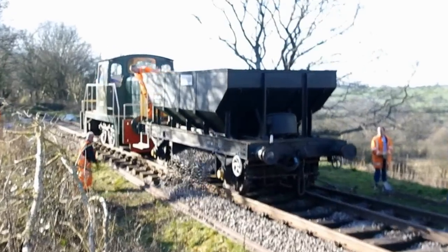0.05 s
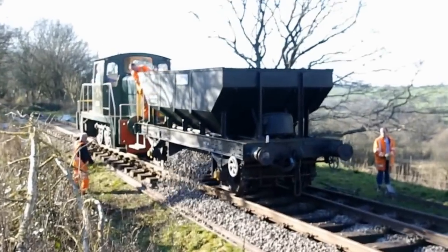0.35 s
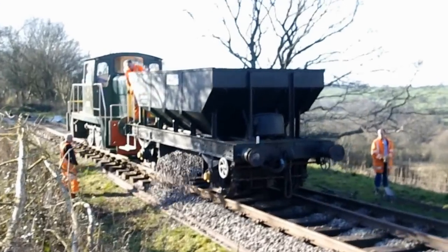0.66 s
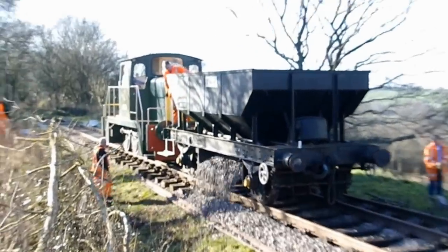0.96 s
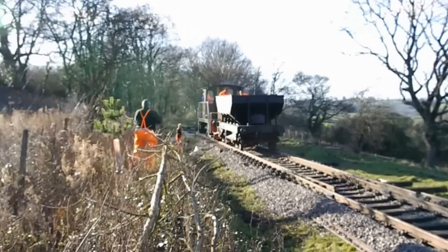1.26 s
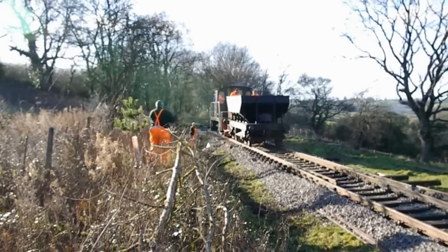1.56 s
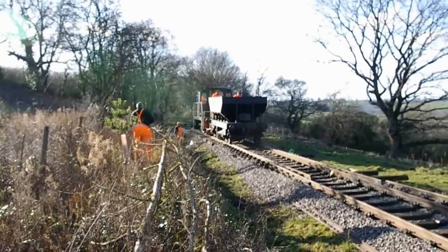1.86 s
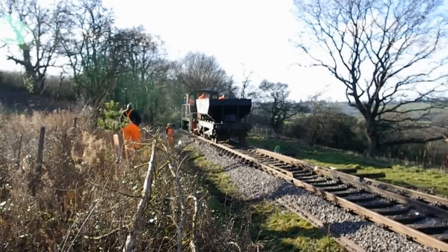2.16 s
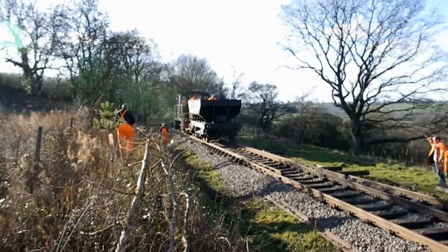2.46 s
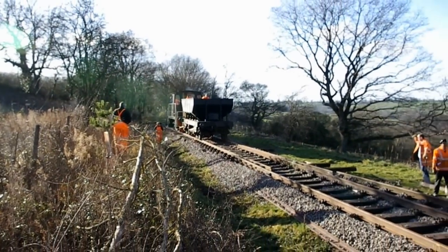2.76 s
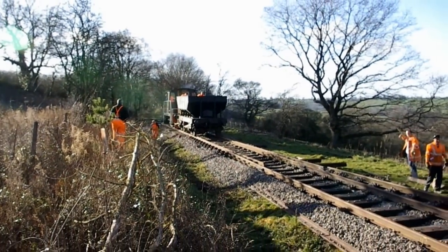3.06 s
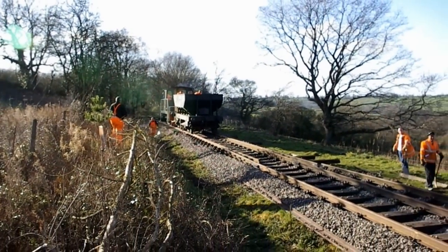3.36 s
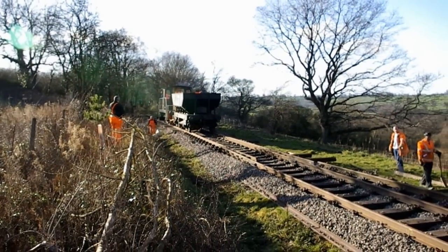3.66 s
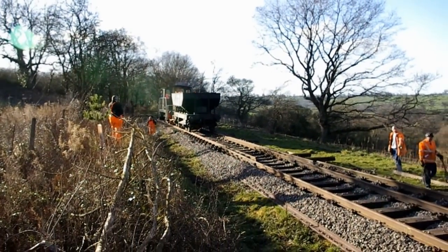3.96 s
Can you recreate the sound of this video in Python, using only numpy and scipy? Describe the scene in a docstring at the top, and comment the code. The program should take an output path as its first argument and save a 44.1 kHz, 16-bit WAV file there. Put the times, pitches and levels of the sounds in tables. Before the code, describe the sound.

Gravel slides and clatters out of a steel rail wagon as wind buffets the microphone.

```python
"""Trackside, one microphone in the wind, close to a steel hopper wagon pouring ballast on the track.
First the stones slide steadily from the chute, a locomotive faint behind, and it all fades to silence.
At 1.18 s a second view cuts in: stones grind and crack, the wagon drums and rings, the engine is louder.
A stone pings on steel, a dull knock follows, and the engine drops back. Just after 3 s the strongest
gusts buffet the microphone, and the recorder's limiter ducks the stones under them."""
import sys
import numpy as np
from scipy import signal
from scipy.fft import rfft, irfft
from scipy.io import wavfile
from scipy.ndimage import uniform_filter1d

SR = 44100
rng = np.random.default_rng(int(sys.argv[2]) if len(sys.argv) > 2 else 0)


def dump_mix(stems):
    """Bounce the given channels to the path in sys.argv[1] as a 16-bit WAV at rate SR."""
    frames = np.atleast_2d(stems).T  # one column per channel
    limited = np.clip(frames, -1, 1)  # hard clip at full scale
    pcm = np.round(limited * 32767).astype(np.int16)
    wavfile.write(sys.argv[1], SR, pcm)


N = 176400
T = np.arange(N) / SR


def amp(db):
    """Decibels to gain."""
    return 10 ** (np.asarray(db) / 20)


def unit(x):
    """Scales to rms 1."""
    return x / np.sqrt(np.mean(x ** 2) + 1e-20)


def level(points):
    """Gain over time from rows of seconds and dB."""
    return amp(np.interp(T, *np.transpose(points)))


def add(mix, start_s, sound):
    """Mixes a sound in at its start time."""
    part = mix[round(start_s * SR):][:len(sound)]
    part += sound[:len(part)]


def colour(x, spectrum):
    """Causal filter with the given spectrum; the result has rms 1."""
    hz, db = np.transpose(spectrum)
    bin_hz = abs(np.fft.fftfreq(4096, 1 / SR)) + 1
    log_gain = np.log(amp(np.interp(np.log(bin_hz), np.log(hz), db)))
    taps = np.fft.ifft(np.exp(np.conj(signal.hilbert(log_gain)))).real
    return unit(signal.oaconvolve(x, taps[:len(taps) // 2])[:N])


def wander(top_hz):
    """Random drift that rolls off above top_hz."""
    hz = np.fft.rfftfreq(N, 1 / SR)
    band = (hz > top_hz / 10) / (1 + (hz / top_hz) ** 2) ** 2
    return unit(irfft(rfft(rng.standard_normal(N)) * band, N))


def impacts(per_s, spread_db):
    """Random blows, many small and a few large."""
    size = amp(spread_db * np.minimum(rng.exponential(1, N), 5))
    return size * rng.choice([-1, 1], N) * (rng.random(N) < per_s / SR)


def scatter(x, wet_db, t60):
    """Adds a short diffuse echo off the wagon, track bed and trees."""
    t = np.arange(SR // 2) / SR
    tail = rng.standard_normal(len(t)) * 10 ** (-3 * t / t60) * (t > .002)
    return x + amp(wet_db) * signal.oaconvolve(x, tail / np.linalg.norm(tail))[:N]


# The engine's rumble. Each row: frequency in Hz, relative level in dB.
ENGINE_SPECTRUM = [(25, -24), (50, -13), (85, -4.5), (125, 3.5), (170, 5.5), (240, 1), (330, 0.5), (600, 5),
                   (2000, -61.5)]
# Its rise and fall behind the wagon. Each row: time in seconds, level in dB.
ENGINE_LEVELS = [(0, -61), (1.14, -49), (1.18, -44.5), (2.3, -43), (2.65, -44.5), (2.9, -53), (4.0, -49)]
def locomotive(firing_hz=33, depth=0.76):
    """In the background, exhaust puffs at the firing rate."""
    puffs = (1 + depth * np.cos(2 * np.pi * firing_hz * T)) * rng.standard_normal(N)
    return level(ENGINE_LEVELS) * colour(puffs, ENGINE_SPECTRUM)


# Gusts on the microphone. Each row: middle in seconds, length in seconds, level in dB.
MIC_GUSTS = [(0.048, 0.075, -38), (.13, 0.0082, -30), (.19, 0.021, -41), (0.247, 0.023, -33.5),
             (0.343, 0.11, -46), (0.818, 0.19, -35), (1.1, .07, -31), (1.408, 0.079, -41),
             (1.526, 0.015, -33), (1.563, 0.011, -31), (1.721, .016, -23), (1.76, 0.042, -39),
             (1.836, 0.043, -35.5), (1.885, .02, -26.5), (1.924, .015, -35), (2.054, 0.057, -18.5),
             (2.116, 0.038, -31.5), (2.243, 0.044, -41), (3.123, 0.047, -22), (3.182, 0.011, -14),
             (3.253, 0.022, -12), (3.277, 0.0094, -15), (3.278, 0.18, -20), (3.314, 0.0089, -18.5),
             (3.366, .012, -11), (3.42, 0.047, -29.5), (3.478, 0.12, -35), (3.513, 0.0074, -34),
             (3.683, 0.013, -34)]
# Their low buffeting. Each row: frequency in Hz, relative level in dB.
WIND_SPECTRUM = [(25, -32), (40, -37), (60, -24.5), (90, -9.5), (160, -4), (240, 3), (330, -3.5), (440, -6),
                 (600, -15), (900, -23.5), (2000, -56), (6000, -86)]
def wind(breeze_db=-64, lump_db=4, steepness=4.4):
    """Lumpy turbulence right at the microphone, swelling with each gust."""
    gusts = sum(amp(db) / (1 + abs(1.86 * (T - middle) / length) ** steepness)
                for middle, length, db in MIC_GUSTS)
    eddies = colour(rng.standard_normal(N), WIND_SPECTRUM) * amp(lump_db * wander(top_hz=70))
    running_rms = np.sqrt(uniform_filter1d(eddies ** 2, size=1500) + 1e-9)
    return (amp(breeze_db) + gusts) * eddies / running_rms


# A knock amid the stones. One row: start in seconds, peak in dB, decay in seconds.
DULL_KNOCK = (2.819, -16.5, 0.0053)
# Its body. Each row: frequency in Hz, relative level in dB.
KNOCK_SPECTRUM = [(80, -29), (250, -1), (500, -11), (850, -2), (1400, -13), (4000, -47)]
def knock():
    """One dull blow that dies away at once."""
    start, db, decay = DULL_KNOCK
    burst = rng.standard_normal(N) * (T >= start) * np.exp(-abs(T - start) / decay)
    blow = colour(burst, KNOCK_SPECTRUM)
    return amp(db) * blow / abs(blow).max()


# Stones drumming on wagon and sleepers. Each row: frequency in Hz, relative level in dB.
DRUM_SPECTRUM = [(150, -18), (500, -14), (750, -5), (920, -1), (1080, -1), (1400, 3), (1750, -0.5),
                 (2300, -4.5), (3200, -10.5), (6000, -49)]
# The drumming from the trackside. Each row: time in seconds, level in dB.
DRUM_LEVELS = [(1.18, -31.5), (1.27, -31.5), (1.6, -29), (1.8, -29), (1.94, -27), (2.15, -29.5), (2.5, -28),
               (2.8, -29.5), (3.1, -31), (3.55, -32), (3.9, -35), (4.0, -35.5)]
# The steel plates. Each row: frequency in Hz, relative level in dB, seconds to fall 60 dB.
PLATE_MODES = [(475, -6, 0.23), (524.4, -5.5, 0.22), (917.5, -4, 0.33), (1326, -9, 0.16),
               (1447, -10.5, .15), (1525, -7, 0.1), (1572, -14, .2), (1697, -4.5, 0.18), (1774, -3.5, 0.16),
               (2010, -17.5, 0.6), (3335, -8, 0.29)]
# The hollow hopper. Each row: frequency in Hz, relative level in dB.
BOOM_SPECTRUM = [(150, -26), (330, -16.5), (430, 0.5), (550, 2.5), (700, -5), (900, -11), (1500, -23),
                 (4000, -58)]
def wagon(blows_per_s=2500, spread_db=3.5, plates_db=-10):
    """Stones drum on the wagon: the plates ring, and the hopper booms less as it empties."""
    thuds = colour(scatter(impacts(blows_per_s, spread_db), wet_db=-2, t60=0.17), DRUM_SPECTRUM)
    ring, t = np.zeros(N), np.arange(SR // 2) / SR
    for hz, db, t60 in PLATE_MODES:
        mode = np.sin(2 * np.pi * hz * t) * 10 ** (-3 * t / t60)
        hits = impacts(per_s=130, spread_db=spread_db)
        ring += amp(db) * unit(signal.oaconvolve(hits, mode)[:N])
    boom_db = -36 - 3 * np.maximum(T - 3.3, 0)  # falls 3 dB a second after 3.3 s
    boom = amp(boom_db) * colour(impacts(blows_per_s, spread_db), BOOM_SPECTRUM)
    return level(DRUM_LEVELS) * (thuds + amp(plates_db) * ring) + boom


# Stone on steel. One row: start in seconds, pitch in Hz, level in dB, rise and decay in seconds.
STEEL_PING = (2.349, 9645, -17, .008, .014)
def ping():
    """One stone strikes steel, which rings with a brief high tone."""
    out, t = np.zeros(N), np.arange(SR // 10) / SR
    start, hz, db, rise, decay = STEEL_PING
    envelope = np.minimum(t / rise, 1) * np.exp(-t / decay)
    add(out, start, amp(db) * envelope * np.sin(2 * np.pi * hz * t))
    return out


# Stones cracking close by. Each row: start in seconds, level in dB, centre in Hz, length in seconds.
STONE_CRACKS = [(1.529, -15, 6300, 0.0047), (1.765, -7.5, 6900, 0.0027), (2.186, -5.5, 6130, 0.0078),
                (2.532, -9, 8600, .008), (2.604, -9.5, 6500, 0.0027), (2.642, -12, 6500, 0.011),
                (2.68, -11, 6540, .002), (2.864, -10, 5200, .006), (2.905, -26, 5900, 0.0019),
                (2.917, -11, 9000, 0.0099), (3.07, -14, 5500, 0.016), (3.136, -30, 4400, .008),
                (3.275, -5.5, 3750, 0.0046), (3.534, -7, 7900, 0.02), (3.544, -11, 8500, 0.011),
                (3.624, -9.5, 6500, 0.0016), (3.656, -12, 5370, 0.028), (3.693, -19, 7900, .002),
                (3.746, -13, 6300, 0.0047), (3.829, -10, 5000, .005), (3.981, -8.5, 6600, 0.0067)]
def cracks(clicks_per_s=6000, snap_decay_s=0.0003, half_width_octaves=0.76):
    """Pinched stones snap, each with a first click and a short crunch of further ones."""
    out, t = np.zeros(N), np.arange(SR // 10) / SR
    hz = np.fft.rfftfreq(len(t), 1 / SR) + 1
    for start, db, centre_hz, length in STONE_CRACKS:
        clicks = rng.standard_normal(len(t)) * (rng.random(len(t)) < clicks_per_s / SR)
        crunch = (t == 0) + 0.57 * clicks * np.exp(-(t / length) ** 2)
        snap = rng.standard_normal(len(t)) * np.exp(-t / snap_decay_s)
        band = 1 / (1 + (np.log2(hz / centre_hz) / half_width_octaves) ** 2)
        burst = irfft(rfft(crunch) * rfft(snap) * band, len(t)) * (t < t[-1] / 2)
        add(out, start, amp(db) * burst / abs(burst).max())
    return out


def clatter(clicks_per_s, spread_db=2.5, decay_cycles=3.15, clump_db=0.5, sizes=28):
    """Stones of many sizes click in clumps, each size at its own pitch, among unpitched ticks."""
    clicks, t = np.zeros(N), np.arange(SR // 100) / SR
    for hz in np.geomspace(1500, 13000, sizes):
        click = np.sin(2 * np.pi * hz * t) * np.exp(-t * hz / decay_cycles)
        hits = impacts(clicks_per_s / sizes, spread_db) * amp(clump_db * wander(top_hz=25))
        clicks += signal.oaconvolve(hits, unit(click) * np.sqrt(hz))[:N]
    ticks = impacts(clicks_per_s / 2, spread_db)
    return unit(unit(clicks) + 1.3 * unit(ticks))


# The chute, heard in the first view. Each row: frequency in Hz, relative level in dB.
POUR_SPECTRUM = [(60, -18), (150, -11), (330, -5.5), (540, 0), (720, -2.5), (960, -7.5), (1350, 0),
                 (1650, -5.5), (1980, -1.5), (2400, -5.5), (2850, -6), (3100, -3), (3600, -5), (4400, -1.5),
                 (6000, 1), (7800, -2), (9400, -3), (10500, -8.5), (12000, -21.5), (14500, -38)]
def pour(level_db=-26):
    """An even stream of stones slides out of the chute."""
    stream = scatter(clatter(clicks_per_s=11000), wet_db=-15, t60=0.12)
    return amp(level_db) * colour(stream, POUR_SPECTRUM)


# Stone on stone, up front in the second view. Each row: frequency in Hz, relative level in dB.
STONE_SPECTRUM = [(200, -56), (700, -5), (2000, -3.5), (2800, -1), (3900, -1.5), (5200, 3), (6500, 1.5),
                  (8000, -1), (10000, -7), (11000, -13.5), (12200, -25), (14500, -39)]
# The flow onto the track. Each row: time in seconds, level in dB.
FLOW_LEVELS = [(1.18, -29.5), (1.35, -29.5), (1.44, -27.5), (1.8, -27.5), (2.0, -25.5), (2.25, -25.5),
               (2.55, -24), (2.9, -23.5), (3.2, -24), (3.5, -24.5), (3.7, -26), (3.9, -27.5), (4.0, -26)]
def stones(surge_db=1.0, surge_hz=30.24):
    """Stones tumble and grind onto the track in quick surges."""
    rattle = clatter(clicks_per_s=7000) * amp(surge_db * wander(surge_hz))
    return level(FLOW_LEVELS) * colour(scatter(rattle, wet_db=-13, t60=0.083), STONE_SPECTRUM)


def scene(fade_end_s=1.141, cut_in_s=1.177):
    """Two views from beside the track, in mono: the first fades out, the second cuts in."""
    background = wind() + locomotive()
    first_view = background + pour()
    ballast = stones() + wagon()
    treble_cut = signal.butter(6, 10000, fs=SR, output="sos")
    single_stones = scatter(signal.sosfilt(treble_cut, cracks() + ping()), wet_db=-9, t60=.12)
    second_view = background + knock() + single_stones + ballast
    fade = np.clip(1 - T / fade_end_s, 0, 1) ** 0.91
    return (fade * first_view + (T >= cut_in_s) * second_view)[None]


def record(dry, low_cut_hz=58, threshold_db=-15.5, recover_db_per_s=110, ceiling=.6, top_hz=14500):
    """The microphone's low cut, then the recorder's quick limiter, soft ceiling and band limit."""
    mic = signal.sosfilt(signal.butter(3, low_cut_hz, "high", fs=SR, output="sos"), dry)
    power_db = 10 * np.log10(abs(uniform_filter1d(mic[0] ** 2, size=170)) + 1e-12)
    recovery_db = T * recover_db_per_s
    held_db = np.maximum.accumulate(power_db + recovery_db) - recovery_db
    over_db = np.maximum(held_db - threshold_db, 0)
    ducked = mic / amp(.8 * uniform_filter1d(over_db, size=90))  # 5:1 ratio
    rounded = ducked / (1 + (ducked / ceiling) ** 8) ** (1 / 8)
    band_limit = signal.firwin(511, top_hz, window=("kaiser", 9), fs=SR)
    return signal.oaconvolve(rounded, band_limit[None], "same")


dry = scene()
out = record(dry)
dump_mix(out)
```